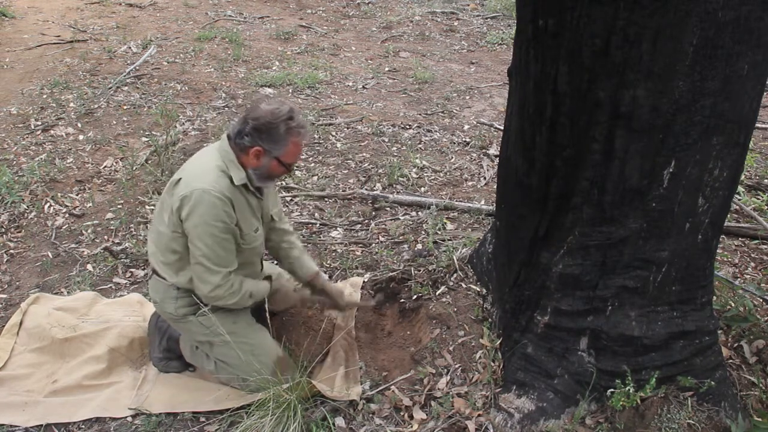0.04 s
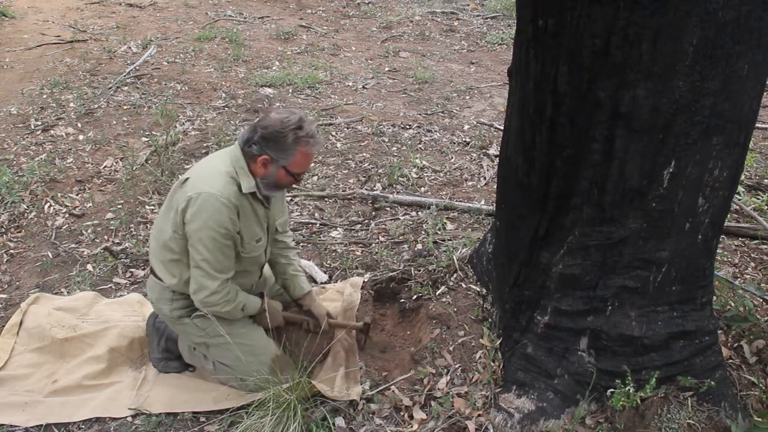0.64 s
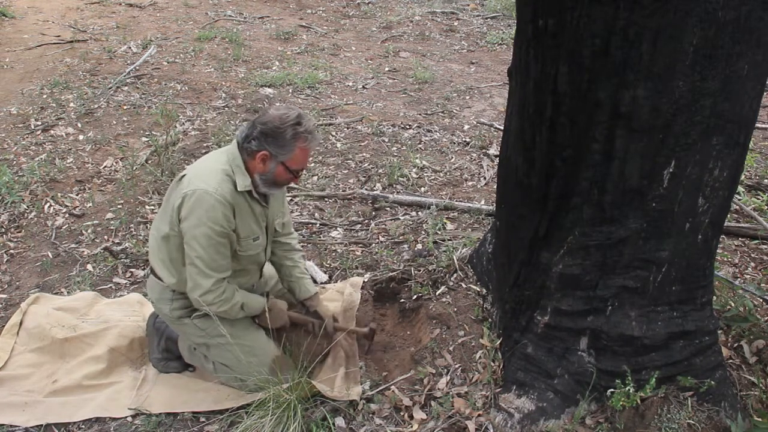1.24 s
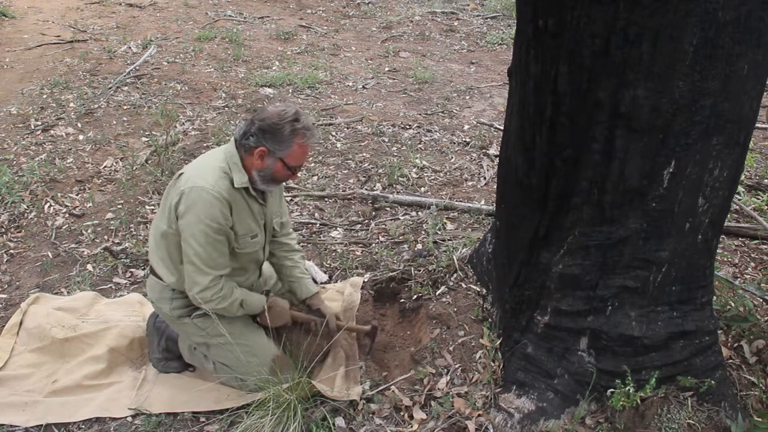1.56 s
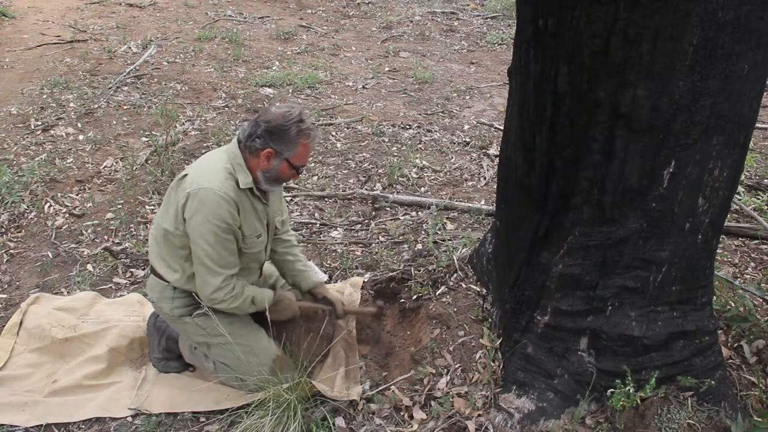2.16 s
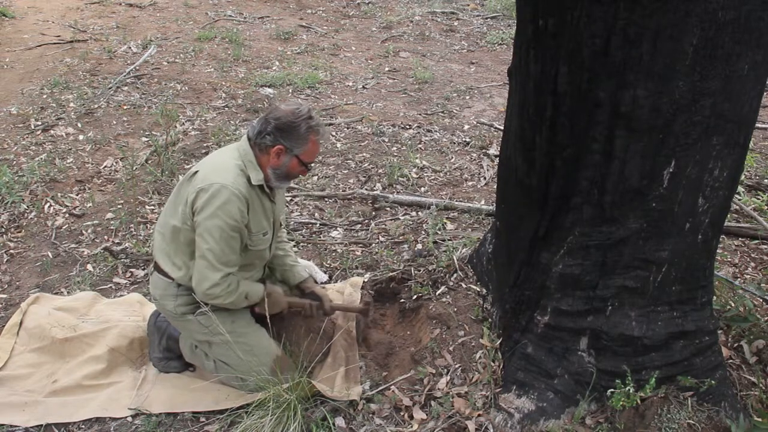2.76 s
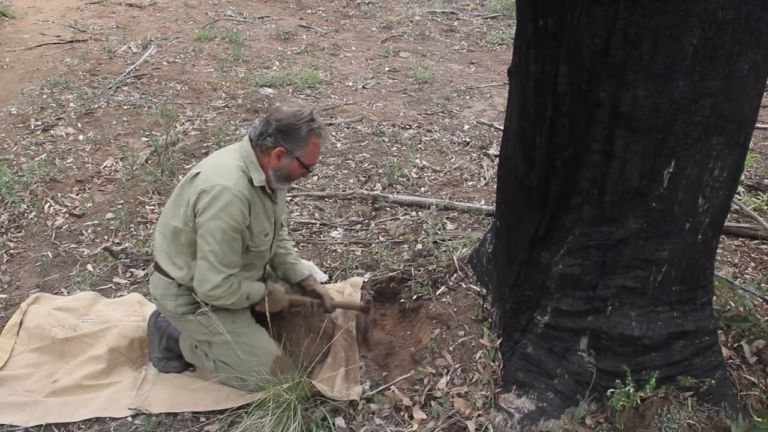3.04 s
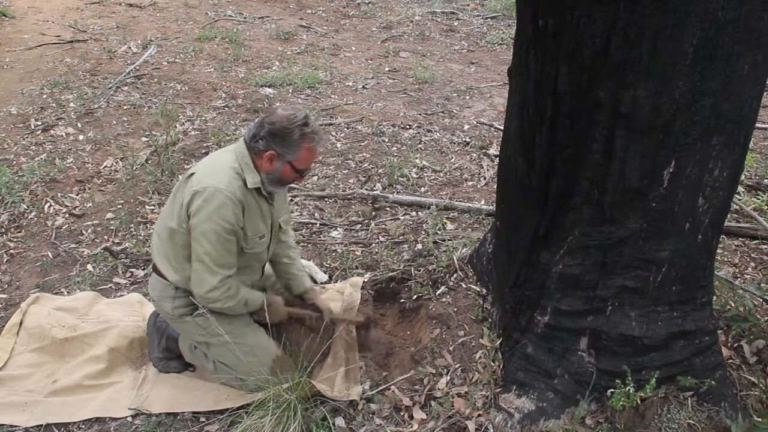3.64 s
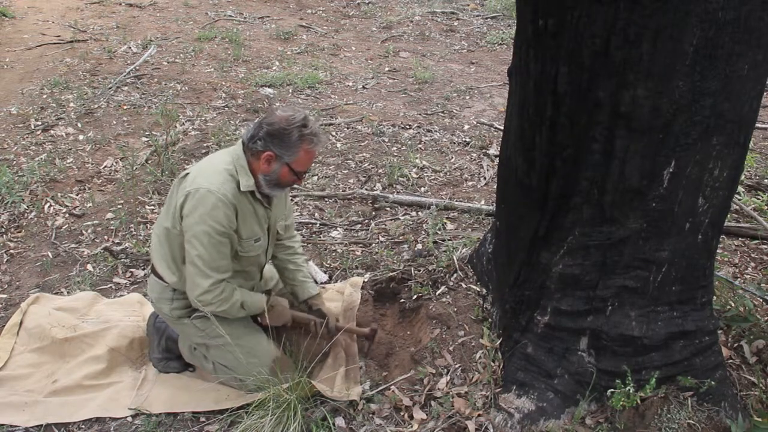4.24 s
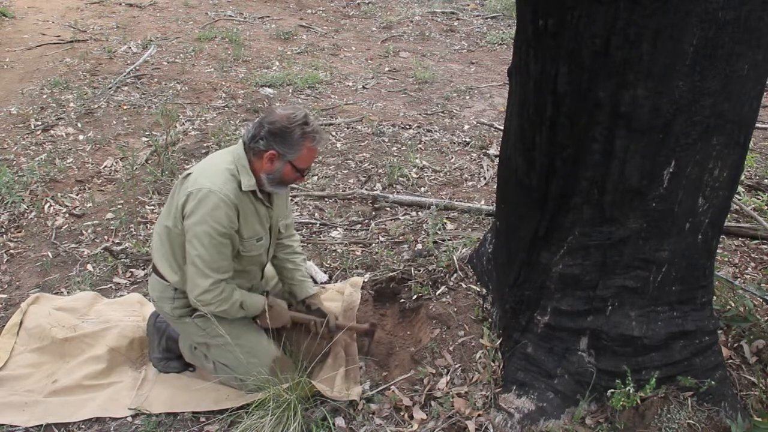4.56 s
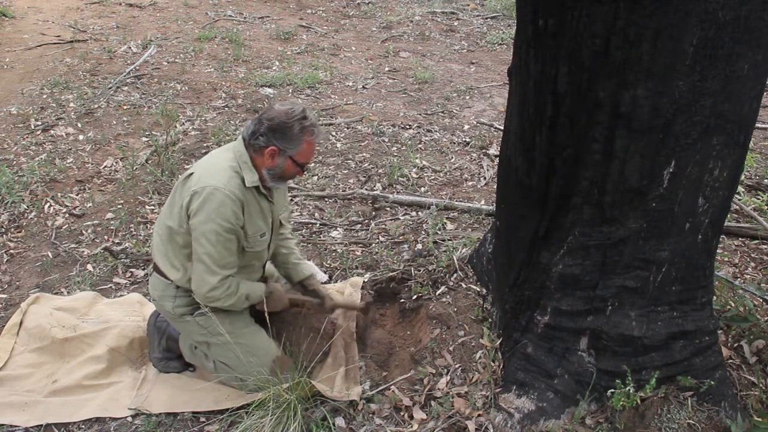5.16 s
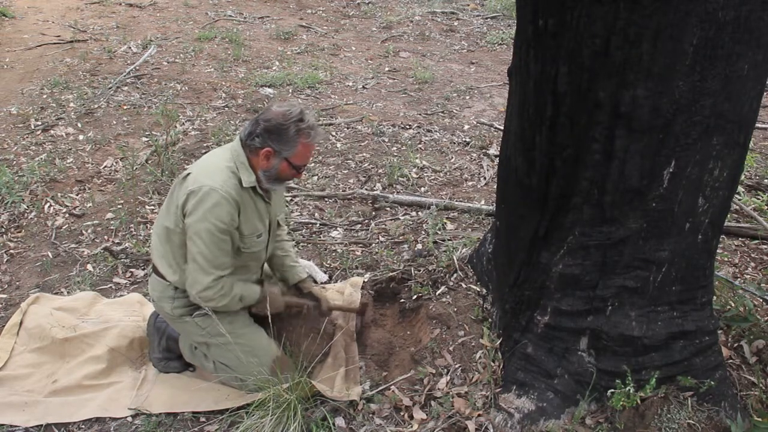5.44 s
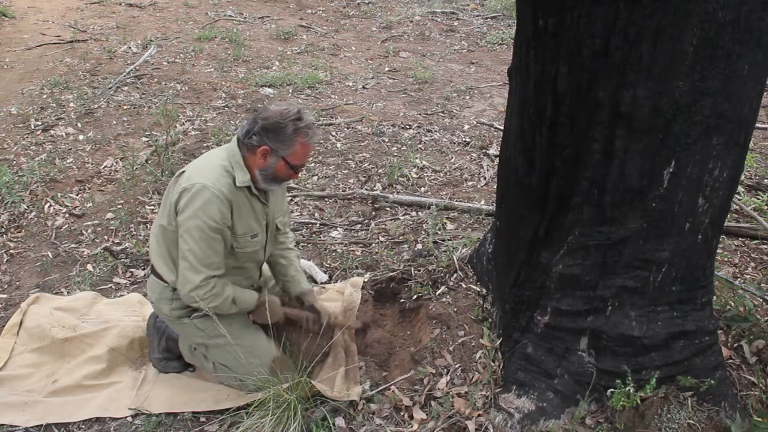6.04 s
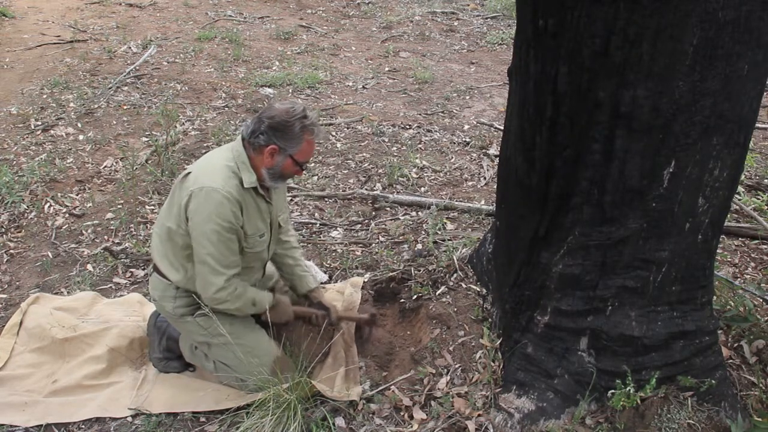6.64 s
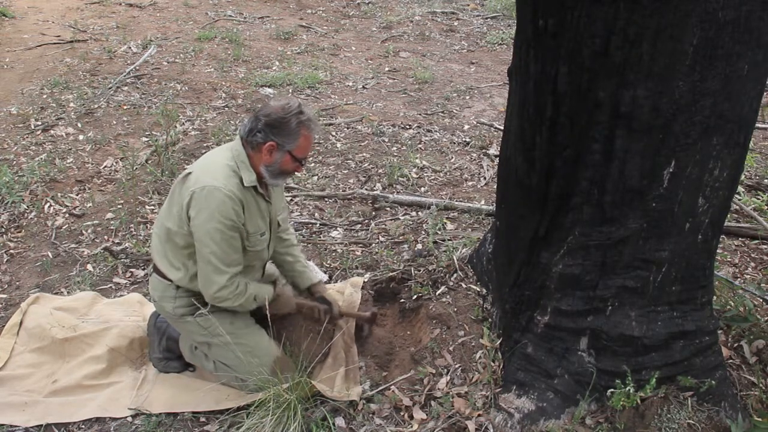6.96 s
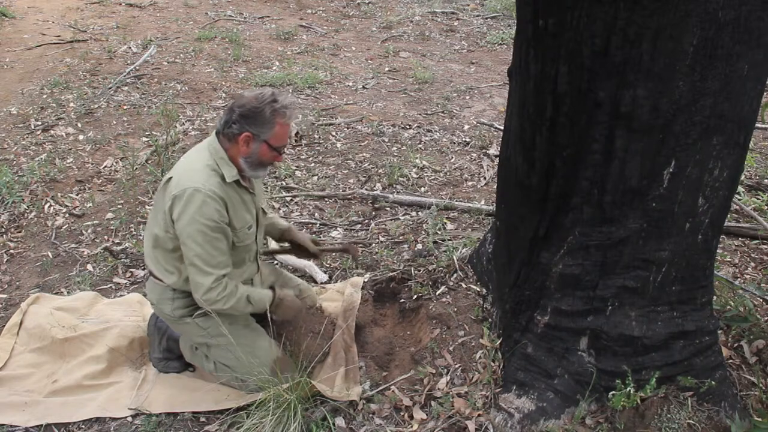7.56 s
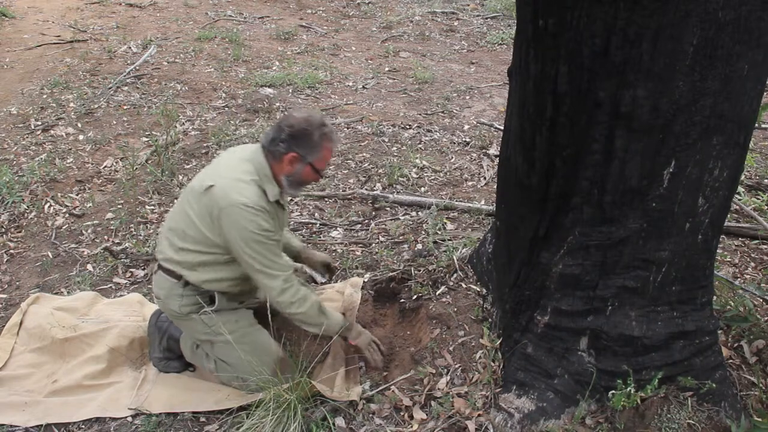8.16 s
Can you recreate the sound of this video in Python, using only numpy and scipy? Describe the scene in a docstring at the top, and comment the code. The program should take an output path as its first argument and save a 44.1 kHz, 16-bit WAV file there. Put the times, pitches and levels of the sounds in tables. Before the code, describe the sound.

Close, dry digging in quiet open woodland: short, uneven, gritty trowel strokes with a slight metallic ring, mixed with thuds of packed earth and trickling soil. Now and then the blade clinks on a stone. After about seven seconds cloth rustles softly, then a hand rubs across the dirt with small dry cracks and a last thud. A low outdoor rumble and faint hiss lie underneath.

```python
"""Quick, gritty back-and-forth scrapes: a kneeling man works a hand trowel against the wall of a small hole.
Grit rings the steel blade, the earth thuds when it digs in, and loose soil sifts down over a cloth sack.
At the end he lifts the trowel out and sweeps the soil with his hand.
Behind it all lies the low rumble and faint hiss of quiet, open woodland."""
import sys
import numpy as np
from scipy import signal
from scipy.fft import rfft, irfft
from scipy.io import wavfile
from scipy.ndimage import uniform_filter1d

SR = 44100
rng = np.random.default_rng(int(sys.argv[2]) if len(sys.argv) > 2 else 0)


def transcribe(u):
    """Save the signal u as a 16-bit wav file named by the first command-line argument.

    u: samples, shape (n,) or (channels, n), limited to [-1, 1]; the rate is SR.
    q: integer samples, one column per channel.
    """
    v = np.clip(np.atleast_2d(u).T, -1, 1)
    q = np.round(v * 32767).astype(np.int16)
    wavfile.write(sys.argv[1], SR, q)


N = 370881
TIME = np.arange(N) / SR
FREE_HZ = 1464  # tuning of a lightly held blade; a stroke tuned higher lifts all its ringing tones

# Strokes of the blade: start/s, end/s, early level/dB, late level/dB, tuning/Hz,
# boost of the upper tones/dB, soil loosened/dB, push on the ground/dB
STROKES = [(0.144, 0.276, -53, -51, 1440, 3.5, -43.5, -40),
           (0.279, 0.304, -41.5, -42, 1455, -0.5, -39.5, -37), (0.358, 0.41, -49, -35, 1430, -8, -48, -40),
           (0.411, 0.489, -29.5, -30.5, 1604, -7, -39, -42),
           (0.661, 0.74, -42, -38.5, 1560, -5, -38.5, -33.5), (0.884, 0.91, -60, -52, 1530, 0, -42, -44),
           (0.978, 1.057, -40.5, -38.5, 1547, -3, -50, -50), (1.257, 1.273, -41, -35.5, 1480, 3, -36, -41),
           (1.537, 1.582, -32.5, -44, 1594, -10, -38, -39), (2.078, 2.191, -33, -37, 1500, -5.5, -42, -39),
           (2.367, 2.424, -38, -42, 1484, -4, -37.5, -33), (2.523, 2.601, -47, -49, 1440, -7, -43.5, -41),
           (2.644, 2.7, -39.5, -46.5, 1476, -4, -38.5, -46), (2.811, 2.869, -46, -39, 1480, -8, -39.5, -44),
           (2.912, 2.966, -41, -34.5, 1480, -0.5, -34.5, -39), (3.071, 3.15, -57, -54, 1490, 1, -41, -44),
           (3.191, 3.251, -41, -34, 1480, -3.5, -37, -35),
           (3.349, 3.407, -40, -42.5, 1480, -6, -40.5, -39.5),
           (3.456, 3.525, -38.5, -40, 1464, -9, -40.5, -39),
           (3.628, 3.678, -41.5, -41.5, 1470, -2, -46, -42),
           (3.728, 3.788, -37.5, -35, 1520, -8, -39.5, -41), (3.935, 3.989, -55, -42, 1350, -14, -46, -41),
           (3.998, 4.058, -38.5, -36.5, 1500, -5, -40, -44),
           (4.251, 4.32, -39.5, -41, 1510, -6.5, -40, -44),
           (4.525, 4.586, -43.5, -39, 1474, -8, -42.5, -45),
           (4.802, 4.857, -40.5, -39.5, 1500, -2, -49, -42), (4.986, 5.005, -38, -47, 1460, -10, -34, -37),
           (5.05, 5.121, -43, -38, 1444, -2, -38, -42), (5.278, 5.291, -37, -34.5, 1470, -22, -34, -33),
           (5.318, 5.371, -36, -40, 1435, -6, -35.5, -39), (5.495, 5.549, -50, -39.5, 1450, -4, -41.5, -43),
           (5.575, 5.661, -44.5, -33.5, 1440, -5, -40.5, -42),
           (5.79, 5.877, -69, -47, 1455, -32, -36.5, -37.5), (5.896, 5.99, -45, -40.5, 1460, -5, -45, -61),
           (6.155, 6.227, -49, -38, 1490, -7, -49, -65), (6.45, 6.528, -33, -45.5, 1500, -6, -43.5, -47),
           (6.68, 6.752, -39.5, -38, 1454, -6.5, -38.5, -33.5),
           (6.961, 7.023, -42.5, -33, 1440, -9.5, -39, -34.5)]
# Tone colour of earth being crushed: f/Hz, level/dB
CRUNCH = [(40, -9), (130, 4.5), (240, -0.5), (325, 1.5), (400, 0.5), (510, -6), (650, -3.5), (1100, -10),
          (2300, -17), (3000, -21), (3800, -12.5), (4800, -36), (8000, -28.5), (15000, -40)]
# Tone colour of fine falling soil: f/Hz, level/dB
SOIL = [(60, -5), (250, 8.5), (700, 3.5), (1150, 1.5), (1800, 0.5), (2800, -2.5), (4500, -5.5), (5300, -5),
        (7300, -3), (8500, -6.5), (9600, -12), (12000, -15.5), (15500, -32.5)]


def scrape(bite_s=0.0093, lead_s=0.047, leave_s=0.0097, swing_hz=50, firm_db=-31):
    """In each stroke grit sticks and slips along the blade, ringing it and crunching the earth."""
    press, brace_hz, bright_db = np.zeros((3, N))
    for start, end, early_db, late_db, tuning_hz, upper_db, *_ in STROKES:
        progress = np.clip((TIME - start) / max(end - start, bite_s), 0, 1)
        # the blade skims loose crumbs before it bites, and lets go quickly
        skim = gain_of(-16) * np.exp(np.minimum(TIME - start, 0) / lead_s)
        bite = np.clip((TIME - start) / bite_s + .5, 0, 1)
        leave = np.exp(-np.maximum(TIME - end + leave_s / 2, 0) / leave_s)
        press += gain_of(early_db + (late_db - early_db) * progress) * np.maximum(bite, skim) * leave
        begun = TIME > start - bite_s
        arch = np.sin(np.pi * progress) - 2 / np.pi  # the blade is deepest in mid-stroke
        brace_hz[begun] = tuning_hz - FREE_HZ + swing_hz * arch[begun]
        bright_db[begun] = upper_db + 5
    slips = grains(per_s=5000, spread_db=2.5, clump_db=1.86, clumps_per_s=82)
    brace_hz += 28 * wander(per_s=45)  # uneven ground keeps changing how the blade is held
    # a light stroke lets the steel sing; a firm one buries it and dulls the ring
    buried = np.tanh(press / gain_of(firm_db))
    free = unit_rms(blade(slips, brace_hz, bright_db))
    damped = unit_rms(blade(slips, brace_hz, bright_db - 3, damping=1.1))
    ring = (1 - buried) * free + buried * damped
    # pressed hard, the whole tool shakes in the hand
    judder = buried * unit_rms(resonate(slips, hz=313, width_hz=55))
    crunch = unit_rms(colour(slips, CRUNCH))
    return press * (gain_of(1) * ring + gain_of(-2) * judder + gain_of(1.5) * crunch)


def blade(drive, brace_hz, upper_db, damping=1):
    """The steel rings. Soil pressing on it lifts its tones by brace_hz; more damping shortens them."""
    # Natural tones of the trowel, damped by hand and soil: f/Hz, width/Hz, level/dB
    tones = [(1409, 173, 8.5), (1574, 440, -8.5), (2120, 300, -12), (4144, 160, 4.5), (5660, 120, -4),
             (5980, 71, -13.5), (6800, 210, -23), (8310, 280, -11), (11800, 270, -25)]
    out = 0
    for hz, width_hz, db in tones:
        ring = resonate(drive, hz + brace_hz, width_hz * damping)
        out = out + gain_of(db + upper_db * (hz > 2 * FREE_HZ)) * ring
    return out


def thuds(rise_cycles=0.15, fade_cycles=0.94, knock_rise_s=0.0019, knock_fade_s=0.0049, glide_s=0.0016):
    """The crust crumbles, then packed earth bounces briefly; a hard blow adds a falling knock."""
    # Blows on the earth: t/s, level/dB, bounce pitch/Hz, knock boost/dB, final knock pitch/Hz
    blows = [(0.139, -14, 80, -28, 340), (0.426, -22, 320, 5, 327), (0.669, -17.5, 127, -12.5, 427),
             (0.982, -24.5, 139, -5, 376), (1.258, -21, 120, -11, 338), (1.537, -12.5, 136, -9.5, 644),
             (1.542, -19.5, 240, -5.5, 427), (1.833, -17, 160, -7, 324), (2.076, -15, 100, -21, 406),
             (2.342, -18.5, 168, -15, 466), (2.927, -31, 101, -33, 880), (3.991, -19.5, 237, -28, 344),
             (4.259, -18, 323, -22, 318), (4.992, -21, 140, -29, 552), (5.286, -13.5, 290, -15, 370),
             (6.161, -6.5, 172, -15.5, 393), (6.443, -13.5, 153, -17.5, 440), (6.656, -13, 189, -13, 447),
             (6.709, -19.5, 179, -5.5, 370), (7.197, -19.5, 93, -21, 410), (7.272, -7.5, 153, -9.5, 302),
             (7.527, -29, 94, -29, 805), (7.615, -28, 153, -28, 342), (7.739, -33, 72.5, -22, 342),
             (7.903, -23.5, 107, -18, 460), (7.963, -28.5, 91.5, -23, 525), (8.044, -31.5, 332, 4, 458),
             (8.284, -22, 73, -16, 390), (8.353, -9, 170, -7.5, 544)]
    out, t = np.zeros(N), TIME[:SR // 8]
    for s, db, hz, hard_db, knock_hz in blows:
        cycles = hz * t
        bounce = np.sin(2 * np.pi * cycles)
        bounce *= (1 - np.exp(-cycles / rise_cycles)) * np.exp(-cycles / fade_cycles)
        falling_hz = knock_hz * (1 + 0.55 * np.exp(-t / glide_s))
        knock = np.sin(2 * np.pi * np.cumsum(falling_hz) / SR)
        knock *= (1 - np.exp(-t / knock_rise_s)) * np.exp(-t / knock_fade_s)
        crumble = unit_rms(colour(rng.standard_normal(len(t)), CRUNCH)) * np.exp(-t / 0.027)
        add(out, s, gain_of(db) * (gain_of(2) * bounce + gain_of(hard_db + 9.5) * knock))
        add(out, s - 0.0043, gain_of(db - 22) * crumble)  # the crust gives way first
    # trim the deepest bass so the thuds do not boom
    return signal.lfilter(*signal.butter(1, 45, "highpass", fs=SR), out)


def sifting(patchy_db=2, patch_hz=700, patch_s=.05):
    """Fine soil pours over the sack and dry leaves; its tone shifts with whatever it lands on."""
    fall = grains(per_s=11000, spread_db=3, clump_db=1.32, clumps_per_s=64)
    hz, t, spectrum = signal.stft(colour(fall, SOIL), SR, nperseg=256)
    # random louder and softer patches, smoothed across pitch and then across time
    patches = rng.standard_normal(spectrum.shape)
    patches = uniform_filter1d(patches, round(patch_hz / hz[1]), axis=0)
    patches = unit_rms(uniform_filter1d(patches, round(patch_s / t[1]), axis=1))
    _, pour = signal.istft(spectrum * gain_of(patchy_db * patches), SR, nperseg=256)
    return soil_flow() * unit_rms(pour[:N])


def soil_flow(lag_s=0.017):
    """How strongly the soil runs: each stroke loosens some, on top of spills and a trickle."""
    # The thin trickle that never quite stops: t/s, level/dB
    trickle = [(0, -36.5), (0.28, -41), (0.55, -47), (1.9, -48.5), (2.3, -44.5), (2.8, -49), (3.4, -46.5),
               (4.4, -55), (5.3, -45), (6.3, -50), (7.2, -42), (7.65, -46.5), (7.95, -52), (8.2, -46.5),
               (8.4, -35.5)]
    # Crumbs running down between strokes: t/s, level/dB, half-length/s
    spills = [(0.035, -51, 0.025), (0.606, -40.5, 0.051), (1.138, -51, .06), (1.404, -45, 0.035),
              (1.702, -43.5, 0.03), (1.743, -46.5, 0.038), (1.836, -38, 0.01), (1.9, -45.5, .03),
              (2.026, -44, 0.054), (2.22, -39.5, 0.074), (3.317, -43, 0.055), (3.928, -47, 0.032),
              (4.17, -49, 0.11), (4.471, -41.5, .025), (4.766, -44, 0.055), (4.905, -45, .06),
              (5.987, -41, 0.01), (6.07, -50, 0.027), (6.16, -45, 0.019), (6.403, -43.5, 0.025),
              (6.914, -44.5, 0.054), (7.062, -47, 0.034), (7.283, -36.5, 0.022), (7.38, -43.5, 0.078),
              (7.468, -45, 0.036), (8.051, -32, 0.012), (8.095, -40, 0.085)]
    power = follow(trickle) ** 2
    for start, end, *_, soil_db, _ in STROKES:
        power += (gain_of(soil_db) * swell(start + lag_s, end, rise_s=0.024, fall_s=0.02)) ** 2
    for s, db, half_s in spills:
        power += (gain_of(db) * hump(s, half_s)) ** 2
    return np.sqrt(power)


def shifting_ground(lag_s=0.0067, rest_db=-52):
    """Clods tumble as the ground gives under each stroke and shove, then settle to a faint stir."""
    # Dull shoves of earth and sack as the man moves his hands: t/s, level/dB
    shoves = [(0.025, -33), (0.17, -28), (0.77, -42.5), (1.765, -37.5), (2.46, -41), (3.55, -53),
              (4.1, -50), (4.51, -35.5), (4.87, -39), (4.935, -39), (5.12, -35), (5.2, -42.5), (5.68, -45),
              (6.05, -49), (6.38, -41), (6.79, -37), (6.89, -39), (7.045, -36), (7.1, -37), (7.38, -38),
              (7.79, -40), (7.94, -37)]
    # Tone colour of moving earth: f/Hz, level/dB
    earth = [(18, -44), (45, 2), (85, 2), (140, -2.5), (240, -10), (340, -15), (600, -21), (1500, -39.5),
             (5000, -59)]
    power = gain_of(rest_db) ** 2
    for start, end, *_, push_db in STROKES:
        power += (gain_of(push_db) * swell(start + lag_s, end + lag_s, rise_s=0.03, fall_s=0.032)) ** 2
    for s, db in shoves:
        power += (gain_of(db) * hump(s, half_s=0.03)) ** 2
    lumps = grains(per_s=1500, spread_db=1.5, clump_db=1, clumps_per_s=50)
    return np.sqrt(power) * unit_rms(colour(lumps, earth))


def clinks(contact_s=0.0042, grit=0.4, tick=0.011):
    """A stone strikes the buried blade and grates for an instant; the soil softens the blow."""
    # The blade catching on stones: t/s, peak/dB
    stones = [(1.258, -24), (1.5454, -20), (2.0928, -19.5), (2.342, -26), (5.287, -31), (5.586, -22.5),
              (5.8217, -24.5), (6.209, -20.5), (6.459, -20.5), (6.6485, -22), (6.654, -30)]
    out, t = np.zeros(N), TIME[:SR // 20]
    for s, db in stones:
        blow = (t == 0) + grit * rng.standard_normal(len(t)) * np.exp(-t / contact_s)
        blow = colour(blow, [(300, 3), (4300, -2.5), (5400, -10), (15000, -5)])
        ring = blade(blow, brace_hz=40, upper_db=3, damping=2.3) + tick * blow
        add(out, s, gain_of(db) * ring / abs(ring).max())
    return out


def snaps(treble_hz=2800):
    """Twigs and crumbs break with single dry clicks; thin twigs crack brighter than buried ones."""
    # Things breaking in the soil: t/s, level/dB, extra treble/dB
    breaks = [(1.831, -12.5, -1.5), (7.804, -28, 14), (7.928, -29.5, 10), (7.962, -27.5, 4),
              (8.039, -23, 5), (8.047, -22.5, 7), (8.300, -34, 8), (8.324, -20, 0), (8.354, -17, 6)]
    # Tone colour of a dry crack: f/Hz, level/dB
    crack = [(100, 0), (450, 3), (700, 4), (900, 7.5), (1200, -7), (1800, -5), (2300, -3.5), (3000, -20),
             (4300, -10), (5400, -41), (15000, -43)]
    out, impulse = np.zeros(N), signal.unit_impulse(SR // 40)
    for s, db, treble_db in breaks:
        click = colour(impulse, [(hz, level + treble_db * (hz > treble_hz)) for hz, level in crack])
        add(out, s, gain_of(db + 1) * click / abs(click).max())
    return out


def hand_sweep():
    """A hand drags over dry soil: a dull rub with one hollow rasp, without the ring of steel."""
    # Strength of the sweep: t/s, level/dB
    strength = [(7.96, -49), (8.03, -51), (8.06, -42.5), (8.18, -39), (8.24, -36.5), (8.33, -37.5),
                (8.355, -35.5), (8.37, -46), (8.41, -34)]
    # Tone colour of a palm on soil: f/Hz, level/dB
    palm = [(100, -14), (350, 1), (650, -2.5), (1250, -7.5), (1600, -0.5), (2200, -15.5), (3200, -13.5),
            (5000, -25), (15000, -61)]
    slips = grains(per_s=4500, spread_db=-1.5, clump_db=1, clumps_per_s=120)
    rub = unit_rms(colour(slips, palm))
    rasp = unit_rms(resonate(slips, hz=1850, width_hz=170))
    return gain_of(1) * follow(strength) * (rub + gain_of(-6) * rasp)


def squeaks():
    """A hard grain chatters for a few milliseconds, with a dry rasp under its pitch."""
    # Brief high squeaks and crackles of grit: t/s, level/dB, f/Hz, length/s
    chirps = [(0.51, -45, 5300, 0.0098), (5, -27, 8070, 0.0088), (5.004, -31, 7200, 0.0095),
              (5.017, -36, 7100, 0.0052), (8.12, -47, 8800, 0.0084), (8.15, -40, 7500, 0.0063)]
    out = np.zeros(N)
    for s, db, hz, length_s in chirps:
        slips, size = rng.standard_normal(SR // 20), int(length_s * SR)
        chatter = unit_rms(resonate(slips, hz, width_hz=450)[-size:])
        rasp = unit_rms(colour(slips, SOIL)[-size:])
        add(out, s, gain_of(db) * (chatter + gain_of(-4) * rasp) * signal.windows.tukey(size, .5))
    return out


def sack(level_db=-49):
    """Coarse cloth rubs with a soft, fine rustle."""
    # The trowel being lifted out over the sack: start/s, end/s
    rub_span = (7.29, 7.47)
    fibres = grains(per_s=4900, spread_db=1, clump_db=3, clumps_per_s=53)
    rustle = unit_rms(resonate(fibres, hz=4600, width_hz=1600))
    return gain_of(level_db) * swell(*rub_span, rise_s=.03, fall_s=.1) * rustle


def air(level_db=-45):
    """Low outdoor rumble with a faint, even hiss."""
    # Tone colour of the woodland air: f/Hz, level/dB
    woodland = [(15, -35.5), (50, 1.5), (110, 1), (230, -14.5), (330, -7), (650, -18.5), (1500, -22.5),
                (3500, -24.5), (8000, -27), (15500, -26)]
    return gain_of(level_db) * unit_rms(colour(rng.standard_normal(N), woodland))


def grains(per_s, spread_db, clump_db, clumps_per_s):
    """Tiny clicks of uneven size at random times, growing louder and softer in clumps."""
    sizes = gain_of(spread_db * np.minimum(rng.exponential(1, N), 4))
    signs = rng.choice([-1, 1], N)
    hits = rng.random(N) < per_s / SR
    return unit_rms(sizes * signs * hits * gain_of(clump_db * wander(clumps_per_s)))


def wander(per_s):
    """A smooth random curve that changes about per_s times a second."""
    hz = np.fft.rfftfreq(N, 1 / SR)
    return unit_rms(irfft(rfft(rng.standard_normal(N)) / (1 + (hz / per_s) ** 4), N))


def resonate(x, hz, width_hz):
    """Makes x ring near hz, which may move, by passing it twice through a filter width_hz wide."""
    turn = np.exp(2j * np.pi * np.cumsum(hz * np.ones(len(x))) / SR)
    decay = np.exp(-np.pi * width_hz / SR)
    for _ in range(2):
        x = 2 * (turn * signal.lfilter([1 - decay], [1, -decay], x / turn + 1e-18)).real
    return x


def colour(x, spectrum, size=4096):
    """Gives x a tone colour (f/Hz, level/dB) while clicks keep their sharp start."""
    hz, db = np.transpose(spectrum)
    log_hz = np.log(abs(np.fft.fftfreq(size, 1 / SR)) + 1)
    log_gain = np.log(gain_of(np.interp(log_hz, np.log(hz), db)))
    taps = np.fft.ifft(np.exp(np.conj(signal.hilbert(log_gain)))).real  # rings only after a click
    return signal.oaconvolve(x, taps[:size // 2])[:len(x)]


def follow(curve):
    """Turns points (t/s, level/dB) into a gain per sample, fading to silence outside them."""
    s, db = np.transpose(curve)
    return gain_of(np.interp(TIME, np.r_[s[0] - .03, s, s[-1] + .05], np.r_[-100, db, -100]))


def swell(start, end, rise_s, fall_s):
    """Rises to 1 at start, holds, and dies away after end."""
    return np.exp(np.minimum(TIME - start, 0) / rise_s - np.maximum(TIME - end, 0) / fall_s)


def hump(s, half_s):
    """A smooth bump of height 1 around time s."""
    return np.exp(-((TIME - s) / half_s) ** 2)


def gain_of(db):
    """Turns decibels into a factor to multiply by."""
    return 10 ** (np.asarray(db) / 20)


def unit_rms(x):
    """Scales x so that its average strength (rms) is 1."""
    return x / np.sqrt(np.mean(x ** 2) + 1e-20)


def add(mix, s, sound):
    """Mixes a sound in at time s."""
    part = mix[max(round(s * SR), 0):][:len(sound)]
    part += sound[:len(part)]


def scene():
    """Everything is close, free of echo and the same in both ears."""
    mono = scrape() + sifting() + shifting_ground() + hand_sweep() + thuds()
    mono += clinks() + snaps() + squeaks() + air() + sack()
    return np.array([mono, mono])


def record(dry):
    """Cuts away the highest treble, above 15800 Hz."""
    lowpass = signal.firwin(511, 15800, window=("kaiser", 9), fs=SR)
    return signal.oaconvolve(dry, lowpass[None], "same")


dry = scene()
out = record(dry)
transcribe(out)
```